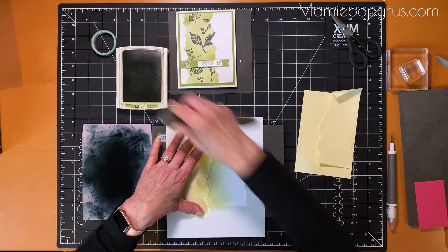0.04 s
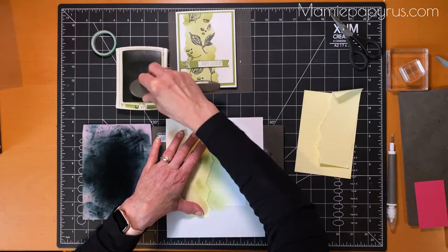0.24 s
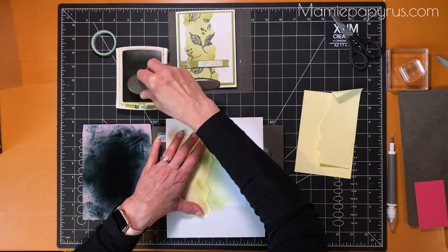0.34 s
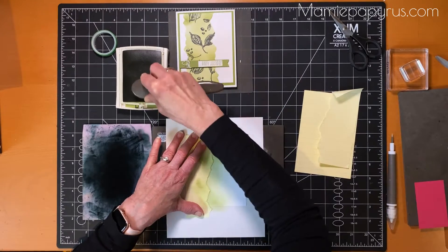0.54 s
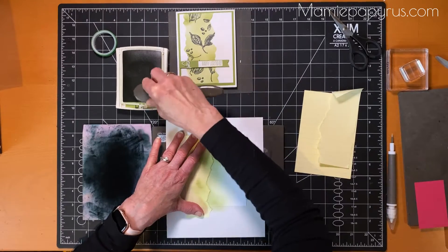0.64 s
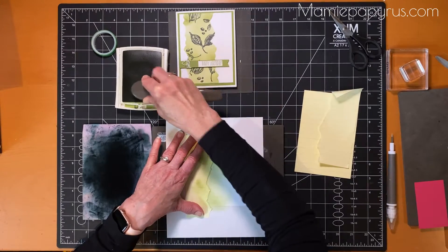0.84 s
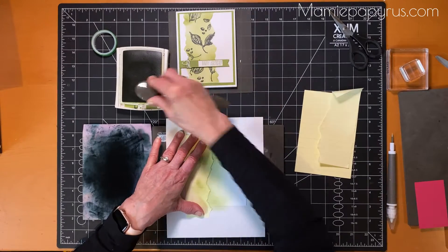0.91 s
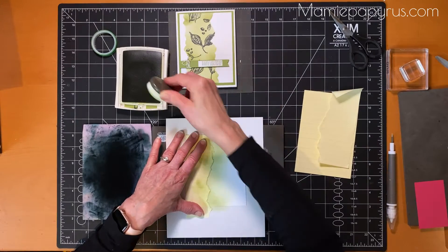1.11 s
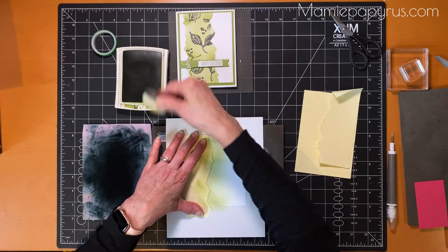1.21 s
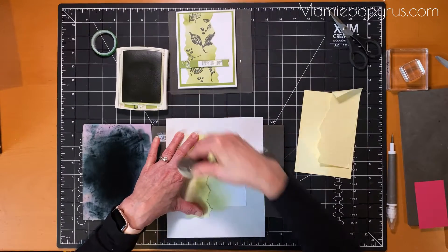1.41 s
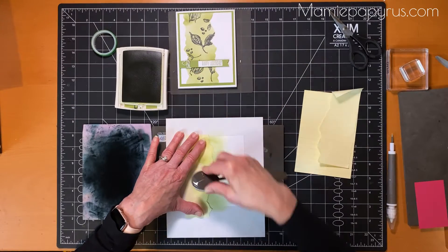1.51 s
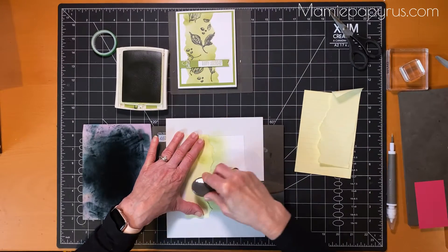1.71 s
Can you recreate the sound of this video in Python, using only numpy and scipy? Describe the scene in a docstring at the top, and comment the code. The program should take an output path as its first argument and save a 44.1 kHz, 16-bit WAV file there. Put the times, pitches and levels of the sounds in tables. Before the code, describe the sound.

A soft brush taps a plastic-cased ink pad four times, amid faint rustling and tiny ticks

```python
"""Hand and sleeve rumble and rustle over paper and mat on a desk: two coloured noises that swell and fade.
Bristles tick as they peel off a sticky ink pad: short noise bursts around one pitch.
A soft blending brush taps the pad four times: small pushes ring its plastic case, with desk thump and room tail.
Handle and fingers add duller ticks: impulses through broad resonances.
A small quiet room, its still air a steady noise, heard by a camera microphone above the desk."""
import sys
import numpy as np
from scipy import signal
from scipy.fft import rfft, irfft
from scipy.io import wavfile
from scipy.ndimage import uniform_filter1d

SR = 44100
rng = np.random.default_rng(int(sys.argv[2]) if len(sys.argv) > 2 else 0)


def voltage_ratio(decibels):
    """Convert decibels (scalar or array-like) to amplitude ratios, 20 dB per decade."""
    exponent = np.asarray(decibels, float) / 20
    return 10 ** exponent


def file_out(sig):
    """Save sig as 16-bit WAV at sys.argv[1]."""
    # one column per channel
    cols = np.atleast_2d(sig).T
    # limit, then scale
    lim = np.clip(cols, -1, 1)
    pcm = np.round(lim * 32767).astype(np.int16)
    wavfile.write(sys.argv[1], SR, pcm)


N = 77175  # length [samples]

# still air of the room: (frequency [Hz], relative density [dB per Hz])
AIR_SPECTRUM = [(20, -7), (60, 0.5), (200, -20.5), (500, -7.5), (1200, -14), (2500, -17.5), (5000, -29.5),
                (10000, -34.5), (16000, -30.5)]
# rubbing of hand and sleeve: (time [s], rumble level [dB], rustle level [dB])
RUBBING_LEVELS = [(0, -53, -69), (.06, -51, -63), (.11, -49, -63), (.13, -53.5, -62.5), (.17, -51.5, -60.5),
                  (.215, -55.5, -64.5), (.24, -53.5, -70), (.33, -62, -79), (.41, -67, -83),
                  (.55, -60, -79.5), (.7, -59, -77), (.85, -61, -80), (0.901, -56.5, -75),
                  (.93, -61.5, -70), (.96, -64, -79), (1.002, -53, -68), (1.051, -57, -66),
                  (1.067, -69.5, -83), (1.15, -64, -77), (1.19, -60, -76.5), (1.25, -60.5, -73.5),
                  (1.29, -63.5, -74), (1.33, -60, -73.5), (1.392, -51.5, -67.5), (1.44, -60.5, -68.5),
                  (1.5, -57.5, -70), (1.53, -63, -73.5), (1.58, -65, -80), (1.595, -61.5, -75),
                  (1.605, -55, -63.5), (1.615, -65.5, -80.5), (1.75, -67.5, -78)]
# low rumble through the desk: (frequency [Hz], relative density [dB per Hz])
RUMBLE_SPECTRUM = [(20, -18), (50, -1), (110, 0), (200, -0.5), (400, -6), (900, -13), (1800, -21.5),
                   (3500, -28), (6000, -42)]
# rustle over paper and mat: (frequency [Hz], relative density [dB per Hz])
RUSTLE_SPECTRUM = [(900, -34.5), (2000, -0.5), (4000, -0.5), (7500, -0.5), (10000, -5), (13000, -11.5),
                   (16000, -30.5)]
# bristles peeling off the pad: (time [s], peak level [dB], centre [Hz])
BRISTLE_TICKS = [(0.09, -43.5, 7300), (0.198, -44.5, 7400), (0.2186, -43.5, 6950), (0.5775, -54, 9300),
                 (0.5854, -68, 6590), (0.591, -49.5, 7850), (0.6374, -64, 6920), (0.6412, -57, 6150),
                 (0.643, -42.5, 7570), (0.656, -57, 6700), (0.7164, -47, 8020), (0.7203, -44.5, 7350),
                 (0.7215, -52, 8800), (0.7392, -52, 9710), (0.7672, -52, 7390), (0.7914, -47, 7600),
                 (0.7933, -51, 8000), (0.797, -55, 8750), (0.9206, -55.5, 9700), (0.9264, -51.5, 6190),
                 (0.9417, -57, 6450), (0.9617, -58, 6960), (0.9784, -65, 7820), (0.9924, -57, 6900),
                 (1.0012, -39.5, 6460), (1.0104, -51, 7900), (1.184, -55.5, 6940), (1.2281, -54, 7300),
                 (1.3335, -54.5, 7900), (1.3643, -51.5, 6600), (1.3967, -72, 6820), (1.484, -49.5, 7600)]
# brush on the pad: (landing time [s], case peak level [dB], time for a push to peak [ms], rebound delay [ms],
# rebound level [dB], pitch factor [ratio], place towards the middle of the pad [dB])
TAPS_ON_PAD = [(0.237, -20.5, 0.079, 2.53, -8, 1, -0.5), (0.4252, -18, 0.097, 3.9, -12, 1.034, 6.5),
               (0.6090, -20.5, 0.071, 2.33, -9.5, 0.99, -1.15),
               (0.7521, -27.5, 0.087, 3.12, -14, .97, -2.5)]
# modes of the plastic case: (frequency [Hz], relative level [dB], t60 [s], share of the place level gained [ratio])
CASE_MODES = [(384.7, -0.5, 0.027, 0.63), (700, -7, 0.037, 0.75), (790, -8, 0.036, -1.6),
              (915, 1, 0.029, 3.1), (1117, -4.5, 0.06, 0), (1257, -3.5, 0.031, 2.5), (1650, -9, 0.053, 2.7),
              (1886, -5, 0.031, 2.58), (2480, -17.5, 0.027, 0.7), (2590, -11.5, 0.039, -0.1),
              (2824, -6, 0.034, 1.9), (3510, -1.5, 0.015, 2), (4770, -6, 0.015, 2.4)]
# which way each case mode pushes the air towards the microphone: (sign [+1 or -1])
CASE_SIGNS = (1, 1, 1, 1, -1, 1, -1, 1, -1, -1, 1, -1, -1)
# thump of the desk top: (frequency [Hz], level before its soft rise [dB], t60 [s])
DESK_MODES = [(52.9, -22.5, 0.14), (138.6, -25.5, 0.13)]
# colour of the room's diffuse reply: (frequency [Hz], relative density [dB per Hz])
ROOM_SPECTRUM = [(150, -15.5), (350, 2), (550, -8.5), (950, 0), (1600, -6), (2700, -13.5), (4500, -27),
                 (8000, -44.5), (16000, -57)]
# decay of the room: (frequency [Hz], t60 [s])
ROOM_DECAY = [(100, 0.33), (400, 0.34), (1200, 0.38), (3000, 0.33), (8000, 0.56)]
# duller ticks of handle and fingers: (time [s], peak level [dB], centre [Hz], width over centre [ratio])
HANDLE_KNOCKS = [(0.866, -56.5, 3650, .4), (0.898, -52.5, 3200, 0.44), (1.0005, -45, 2770, 0.39),
                 (1.2614, -45.5, 2800, 1.7), (1.320, -53.5, 700, 0.52), (1.470, -60, 1400, 0.46),
                 (1.588, -50.5, 1800, 0.95), (1.6892, -48.5, 4500, 1.64)]


def evened(x):
    """Scales to rms 1."""
    return x / np.sqrt(np.mean(x ** 2) + 1e-20)


def read(points, hz):
    """Reads a table on a log-frequency axis."""
    f, value = np.transpose(points)
    return np.interp(np.log(hz + 1), np.log(f + 1), value)


def coloured(x, spectrum):
    """Filters x by the spectrum, at rms 1."""
    gain = voltage_ratio(read(spectrum, np.fft.rfftfreq(len(x), 1 / SR)))
    return evened(irfft(rfft(x) * gain, len(x)))


def band_passed(x, low_hz, high_hz):
    """Keeps one band of x."""
    return signal.sosfilt(signal.butter(2, [low_hz, high_hz], "band", fs=SR, output="sos"), x)


def add(mix, s, sound):
    """Mixes a sound in at s seconds."""
    part = mix[round(s * SR):][:len(sound)]
    part += sound[:len(part)]


def still_air():
    """The quiet room before the microphone: steady coloured noise."""
    return voltage_ratio(-69.5) * coloured(rng.standard_normal(N), AIR_SPECTRUM)


def rubbing():
    """Friction gives a lumpy low rumble through the desk, and a rustle of hiss and tiny snaps."""
    lump_db, lump_s = 2.5, 0.006
    grains_per_s, grain_spread_db, biggest_grain = 700, 4.5, 3  # biggest: in spreads
    snap_decay_s, hiss_share = 0.00023, 0.45  # decay of snap power to 1/e
    s, rumble_db, rustle_db = np.transpose(RUBBING_LEVELS)
    t = np.arange(N) / SR

    lumps = rng.standard_normal(N)
    for _ in range(2):
        lumps = uniform_filter1d(lumps, int(lump_s * SR))
    lumpy_noise = rng.standard_normal(N) * voltage_ratio(lump_db * evened(lumps))
    rumble = coloured(lumpy_noise, RUMBLE_SPECTRUM)

    grain_db = grain_spread_db * np.minimum(rng.exponential(1, N), biggest_grain)
    grains = voltage_ratio(grain_db) * (rng.random(N) < grains_per_s / SR)
    power = signal.lfilter([1], [1, -np.exp(-1 / (snap_decay_s * SR))], grains ** 2)
    snaps = evened(np.sqrt(power) * rng.standard_normal(N))
    hiss = rng.standard_normal(N)
    rustle = coloured(hiss_share * hiss + (1 - hiss_share) * snaps, RUSTLE_SPECTRUM)
    return voltage_ratio(np.interp(t, s, rumble_db)) * rumble + voltage_ratio(np.interp(t, s, rustle_db)) * rustle


def bristle_tick(start, peak_db, hz):
    """A bristle lets go of the pad: a very short noise burst around one pitch, with a wide snap."""
    t60, width, wide_db, rise_s = 0.0038, 0.36, -16.5, 0.000068  # t60 [s], width over centre
    t = np.arange(900) / SR
    narrow = evened(band_passed(rng.standard_normal(len(t)), hz * (1 - width / 2), hz * (1 + width / 2)))
    wide = evened(band_passed(rng.standard_normal(len(t)), 3500, 12000))
    envelope = (1 - np.exp(-t / rise_s)) * voltage_ratio(-60 * t / t60)
    burst = (narrow + voltage_ratio(wide_db) * wide) * envelope
    return start, voltage_ratio(peak_db) * burst / abs(burst).max()


def case_ring(t, force, pitch, place_db):
    """The pushes excite the decaying modes of the pad case."""
    ring = np.zeros(len(t))
    for sign, (hz, db, t60, share) in zip(CASE_SIGNS, CASE_MODES):
        ring += sign * voltage_ratio(db + share * place_db - 60 * t / t60) * np.sin(2 * np.pi * hz * pitch * t)
    rung = signal.fftconvolve(force, ring)[:len(t)]
    # the small case moves little air below 302 Hz
    body = -signal.lfilter(*signal.butter(3, 302, "high", fs=SR), rung)
    return body / abs(body).max()


def landing_crack(late):
    """Gritty band of noise that starts at the landing and dies quickly."""
    grit = evened(band_passed(rng.standard_normal(len(late)), 2000, 4630))
    return voltage_ratio(-20 - 60 * late / 0.024) * (late > 0) * grit


def desk_thump(late):
    """The desk top answers the landing with low decaying modes and a 2 ms soft rise."""
    modes = sum(voltage_ratio(db - 60 * late / t60) * np.sin(2 * np.pi * hz * late) for hz, db, t60 in DESK_MODES)
    return (1 - np.exp(-late / 0.002)) * modes


def room_tail(late):
    """The diffuse reply to one tap: coloured noise whose bands die at their own speed."""
    level_db, start_s = -23, 0.002  # level before the decay
    size = len(late)
    hz, t, bands = signal.stft(coloured(rng.standard_normal(size), ROOM_SPECTRUM), SR, nperseg=256)
    decay = voltage_ratio(-60 * t / read(ROOM_DECAY, hz)[:, None])
    tail = signal.istft(bands * decay, SR, nperseg=256)[1][:size]
    return voltage_ratio(level_db) * (1 - np.exp(-(late / start_s) ** 2)) * tail


def tap(landing, level_db, contact_ms, rebound_ms, rebound_db, pitch, place_db):
    """Tips touch, the head lands and rebounds once: all ring the case, the landing starts the rest."""
    touch_ms, touch_db = 2.0, -22  # lead of the tips over the landing, and their level against it
    t = np.arange(0, 0.6, 1 / SR)

    def push(ms):
        """A soft contact: force rises and dies as x exp(-x)."""
        x = np.maximum(t * 1000 - ms, 0) / contact_ms
        return x * np.exp(-x)

    force = voltage_ratio(touch_db) * push(0) + push(touch_ms) + voltage_ratio(rebound_db) * push(touch_ms + rebound_ms)
    late = np.maximum(t - touch_ms / 1000, 0)  # time since the landing
    sound = case_ring(t, force, pitch, place_db) + landing_crack(late) + desk_thump(late) + room_tail(late)
    return landing - touch_ms / 1000, voltage_ratio(level_db) * sound


def handle_knock(start, peak_db, hz, width):
    """Handle or finger contact: one clean impulse, of either sign, through a broad resonance."""
    click = band_passed(np.arange(600) == 0, hz * (1 - width / 2), hz * (1 + width / 2))
    return start, rng.choice([-1, 1]) * voltage_ratio(peak_db) * click / abs(click).max()


def scene():
    """Ticks, taps and knocks over rubbing and still air."""
    mix = still_air() + rubbing()
    for row in BRISTLE_TICKS:
        add(mix, *bristle_tick(*row))
    for row in TAPS_ON_PAD:
        add(mix, *tap(*row))
    for row in HANDLE_KNOCKS:
        add(mix, *handle_knock(*row))
    return mix[None]


def roll_off(x):
    """The treble ends steeply here."""
    return signal.sosfilt(signal.butter(12, 16290, fs=SR, output="sos"), x)


def record(dry):
    """Returns the finished mix as it is heard."""
    return roll_off(dry)


dry = scene()
out = record(dry)
file_out(out)
```